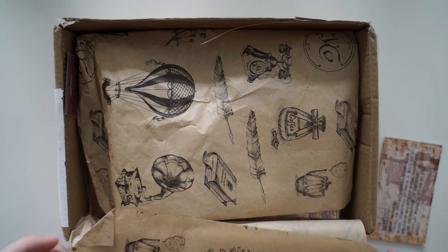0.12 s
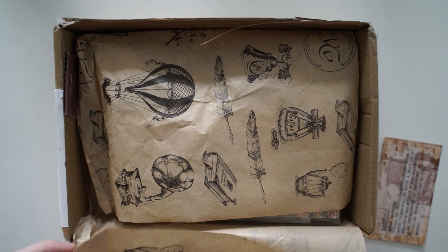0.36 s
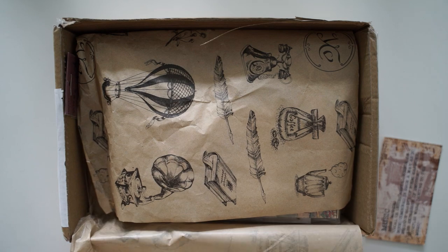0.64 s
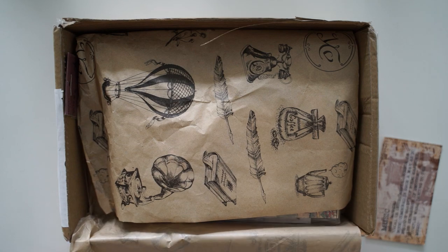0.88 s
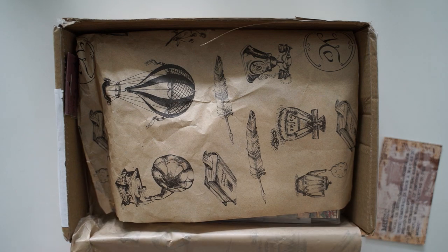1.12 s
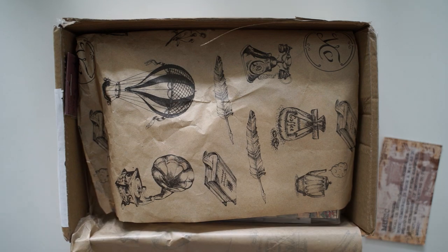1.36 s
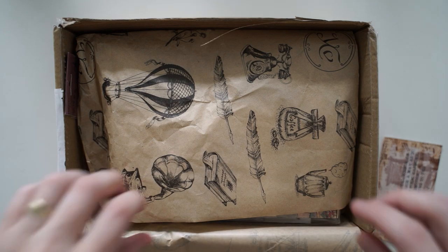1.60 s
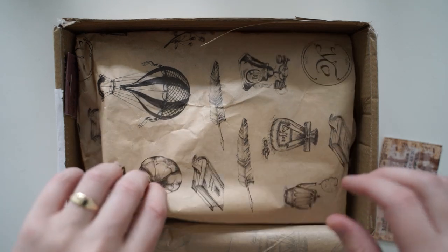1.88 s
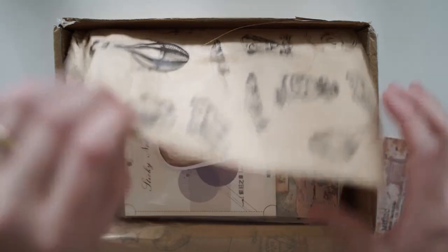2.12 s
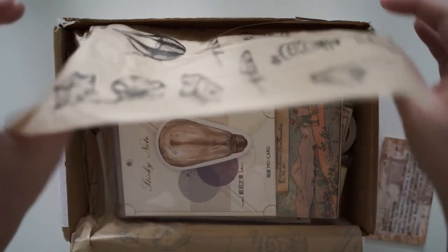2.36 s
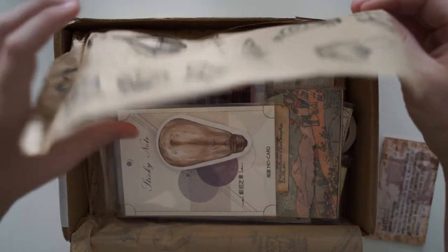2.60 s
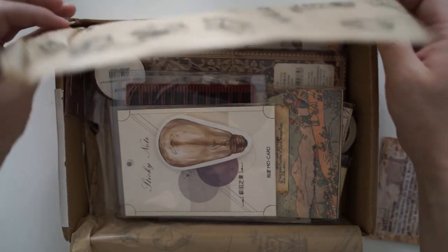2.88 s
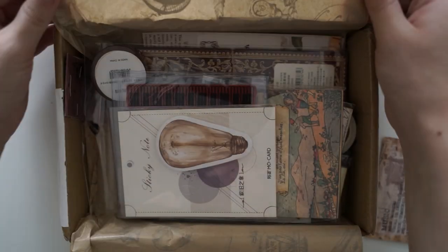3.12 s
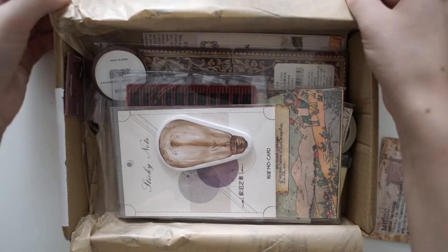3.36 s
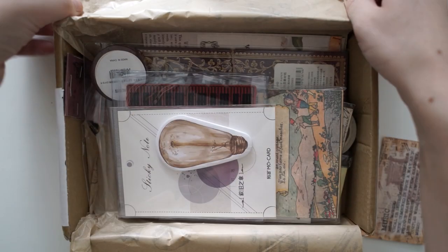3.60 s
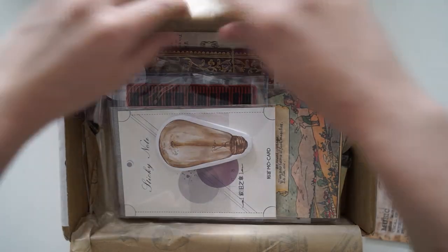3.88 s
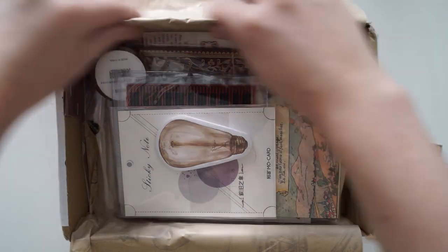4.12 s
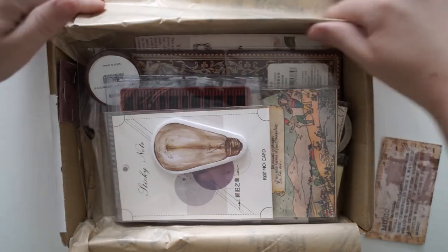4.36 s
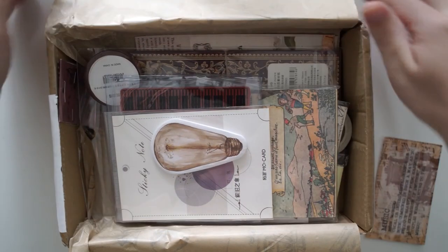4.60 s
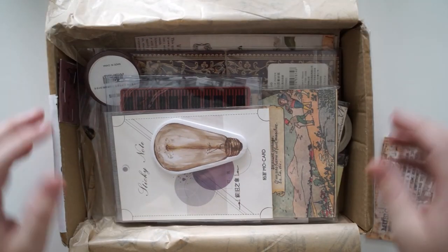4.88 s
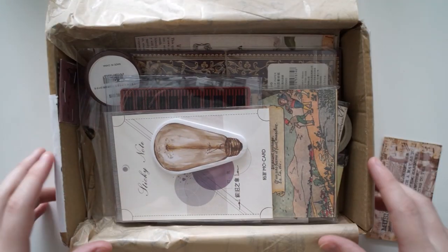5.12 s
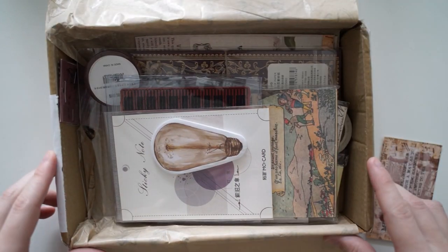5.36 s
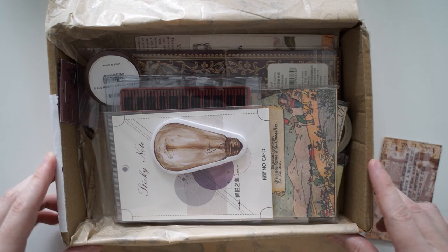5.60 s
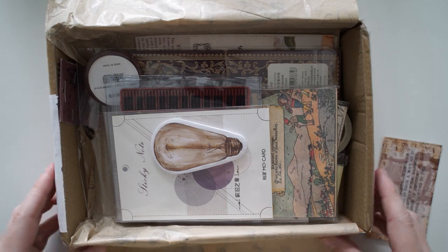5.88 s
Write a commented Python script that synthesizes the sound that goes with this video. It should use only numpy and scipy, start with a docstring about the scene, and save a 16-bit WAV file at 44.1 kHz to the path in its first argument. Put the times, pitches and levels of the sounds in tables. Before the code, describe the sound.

Hands unfold stiff wrapping paper over a cardboard box, sharp crinkly snaps over fine crackle and hiss, with short pauses in a small quiet room.

```python
"""Short snaps stand out over clumps of tiny crackles and a hiss: hands unfold stiff wrapping paper over a
cardboard box on a table, in spells, under a stereo microphone. Creases are bursts of noise that ring panels
of the sheet; the hollow box and the flexing sheet resonate along. A few soft low bumps come between.
A small room answers the paper with decaying noise, over a faint room tone of air noise and hum."""
import sys
import numpy as np
from scipy import signal
from scipy.fft import rfft, irfft, next_fast_len
from scipy.io import wavfile
from scipy.ndimage import uniform_filter1d, map_coordinates

SR = 44100
rng = np.random.default_rng(int(sys.argv[2]) if len(sys.argv) > 2 else 0)


def voltage_ratio(decibels):
    """Convert decibels (scalar or array-like) to amplitude ratios, 20 dB per decade."""
    exponent = np.asarray(decibels, float) / 20
    return 10 ** exponent


def to_wav(sig):
    """Store sig (one row per channel, or 1-D mono) as 16-bit WAV at the path in sys.argv[1].

    Samples outside -1..1 are clipped; the rate is SR.
    """
    pcm = np.clip(np.atleast_2d(sig), -1, 1) * 32767
    pcm = np.round(pcm).astype(np.int16)
    wavfile.write(sys.argv[1], SR, pcm.T)  # frames by channels


N = 264159

SPLIT_HZ = 2200  # between the low and the high half of the paper sound
TOP_HZ = 11030  # upper end of the treble


def unit(x):
    """Scale to rms 1."""
    return x / np.sqrt(np.mean(x ** 2) + 1e-20)


def along(points, hz):
    """Read (frequency [Hz], value) points on a log frequency axis."""
    f, v = np.transpose(points)
    return np.interp(np.log(hz + 1), np.log(f + 1), v)


def filtered(x, response):
    """Multiply the spectrum of x by a complex response of frequency."""
    m = next_fast_len(N + SR // 2)
    return irfft(rfft(x, m) * response(np.fft.rfftfreq(m, 1 / SR)), m)[..., :N]


def resonance(hz, centre_hz, width_hz):
    """One vibrating mode, gain 1 at its centre."""
    return 1j * hz * width_hz / (centre_hz ** 2 - hz ** 2 + 1j * hz * width_hz)


def stereo(pair):
    """Two unrelated signals become left and right, alike in the bass and apart in the treble."""
    # likeness of left and right, limited to 0-1 below: (frequency [Hz], likeness [ratio])
    alike = [(600, 1.24), (4000, 0.58), (11000, 0.24)]

    def mid_side_gains(hz):
        turn = np.arccos(np.clip(along(alike, hz), 0, 1)) / 2
        return np.array([np.cos(turn), np.sin(turn)])

    mid, side = filtered(pair, mid_side_gains)
    return np.array([mid + side, mid - side])


def room_tone():
    """Steady coloured air noise and a slightly unsteady appliance hum, a single sine."""
    # relative spectrum of the air noise: (frequency [Hz], density [dB per Hz])
    air_colour = [(25, -25), (90, -12), (300, -1.5), (520, 1), (1200, 0.5), (2500, -7.5), (4000, -10.5),
                  (11000, -16.5)]
    hum_hz, hum_db, air_db = 185, -78.0, -60.0
    noise = rng.standard_normal((2, N))
    air = unit(stereo(filtered(noise, lambda hz: voltage_ratio(along(air_colour, hz)) * (hz < TOP_HZ))))
    t = np.arange(N) / SR
    waver_db = 4.0 * map_coordinates(rng.standard_normal(60), [t * 8])  # 8 random points a second
    hum = voltage_ratio(hum_db + waver_db) * np.sin(2 * np.pi * hum_hz * t)
    return voltage_ratio(air_db) * air + hum


def thumps():
    """Soft low bumps, perhaps a hand or the sheet against the box: sines that swell and die smoothly."""
    # (start [s], envelope peak [dB], pitch [Hz])
    bumps = [(2.505, -45, 307), (4.916, -57, 280), (5.136, -52, 293)]
    peak_s = 0.0064  # time from the start to the peak
    out, t = np.zeros(N + SR), np.arange(SR // 8) / SR
    envelope = (t / peak_s) * np.exp(1 - t / peak_s)
    for s, db, hz in bumps:
        out[round(s * SR):][:len(t)] += voltage_ratio(db) * np.sin(2 * np.pi * hz * t) * envelope
    return out[:N]


def room(x, count=6):
    """Random tails, each frequency dying at its own speed, taken in turn so that no one pattern repeats."""
    # reverberation: (frequency [Hz], time to fall 60 dB [s])
    decay = [(300, 0.32), (2000, 0.14), (10000, 0.15)]
    hz, t, z = signal.stft(rng.standard_normal((count, 2, SR // 2)), SR, nperseg=256)
    tails = signal.istft(z * voltage_ratio(-60 * t / along(decay, hz)[:, None]), SR, nperseg=256)[1]
    turn = np.arange(N) // (SR // 12) % count  # the next tail takes over 12 times a second
    wet = 0
    for k, tail in enumerate(tails):
        wet = wet + signal.fftconvolve(x * (turn == k), tail / np.linalg.norm(tail[0]), axes=1)
    return np.pad(wet, ((0, 0), (200, 0)))[:, :N]  # the answer starts 200 samples late


def sheet_colour(hz, full_db):
    """Spectrum of the paper: high half of rms gain 1, low half set by the fullness."""
    # relative sound of the sheet: (frequency [Hz], density [dB per Hz])
    sheet = [(35, -69), (191, -33), (520, -8.5), (705, -7.5), (1220, -2), (2850, -1), (4800, -3.5),
             (11000, -6), (22000, -120)]
    low_share = 1 / (1 + (hz / SPLIT_HZ) ** 6)
    colour = voltage_ratio(along(sheet, hz))
    low = unit(colour * low_share ** .5)
    high = unit(colour * (1 - low_share) ** .5)
    return np.sqrt(high ** 2 + (voltage_ratio(full_db)[..., None] * low) ** 2)


def creases(s, db, ring_hz, full_db, ms, ring_db, q, size=1024):
    """Each buckling crease is a burst of noise that swells and dies, and rings the flat panel beside it."""
    rise = 0.72  # swell as a share of the burst length
    reach = 7.4  # a burst dulls above this multiple of its panel's ring
    u = np.arange(size // 2) / SR * 1000 / ms[:, None]  # time in burst lengths
    shape = np.clip(u / rise, 0, 1) * voltage_ratio(db[:, None] - 8.1 * np.clip(u - rise, 0, None) ** 1.6)
    hz, c = np.fft.rfftfreq(size, 1 / SR), ring_hz[:, None]
    panel = 1 + voltage_ratio(ring_db) * resonance(hz, c, c / q)
    colour = sheet_colour(hz, full_db) * panel / np.sqrt(1 + (hz / (reach * c)) ** 2)
    lead = size // 8  # space for the filter to spread ahead of the burst
    noise = rng.standard_normal((len(s), 2, size // 2)) * shape[:, None]
    noise = np.pad(noise, ((0, 0), (0, 0), (lead, 0)))
    rows = irfft(rfft(noise, size) * colour[:, None], size)
    # the colour leaves the energy of each burst to its envelope
    rows *= (np.linalg.norm(shape, axis=1)[:, None] / np.linalg.norm(rows, axis=2))[..., None]
    at = ((s * SR).astype(int)[:, None] + np.arange(size)).ravel()
    return np.array([np.bincount(at, rows[:, k].ravel(), N + size)[lead:][:N] for k in range(2)])


def patchy(x, worked_hz, ring_db, q, patchy_db, size=512):
    """The hiss rings the worked panel and comes in patches of random gain over time and frequency."""
    hz, t, z = signal.stft(x, SR, nperseg=size)
    c = worked_hz[np.minimum((t * SR).astype(int), N - 1)]
    # the ring frequency wobbles slightly at random
    c = c * (1 + 0.01 * map_coordinates(rng.standard_normal(300), [t * 18]))
    field = uniform_filter1d(rng.standard_normal(z.shape[1:]), size=16, axis=0)
    field = unit(uniform_filter1d(field, size=2, axis=1))
    ring = 1 + voltage_ratio(ring_db) * abs(resonance(hz[:, None], c, c / q))
    return signal.istft(z * voltage_ratio(patchy_db * field) * ring, SR, nperseg=size)[1][:, :N]


def handling(t):
    """Rustle dB and worked panel Hz: crushes swell, sag while held, stop and relax over each spell's rustle."""
    # spells in which the hands touch the paper: (start [s], end [s], faint rustle [dB])
    spells = [(0.131, 1.335, -56), (1.70, 4.77, -56), (5.105, 6.0, -55)]
    # the hands crush or pull the sheet:
    # (peak [s], rustle [dB], swell [s], hold [s], ring of the panel they work [Hz])
    crushes = [(0.012, -47, .02, .015, 1590), (.145, -41.5, .02, .09, 3930), (0.412, -38, .03, .07, 1183),
               (.535, -38, .015, .045, 4400), (0.62, -45, .05, .04, 3380), (0.713, -40, .03, .018, 2700),
               (.842, -28, .012, .048, 3130), (0.955, -35, .03, .02, 3030), (1.016, -35, .008, .02, 4530),
               (1.158, -43, .04, .04, 4400), (1.706, -42, .008, .05, 1320), (1.892, -33, .015, .06, 3140),
               (2.053, -31.5, .007, .024, 3520), (2.18, -43, .08, .05, 5050),
               (2.444, -36.5, .015, .085, 2790), (2.549, -34, .015, .018, 2130),
               (2.595, -39, .03, .04, 2760), (2.829, -37, .1, .15, 2860), (3.073, -33, .05, .16, 2840),
               (3.256, -32.5, .03, .11, 1716), (3.483, -36, .04, .085, 4300), (3.659, -37, .08, .07, 832),
               (3.79, -42, .1, .05, 4070), (3.97, -29, .012, .045, 1730), (4.04, -42, .03, .06, 4300),
               (4.16, -33, .07, .065, 2720), (4.238, -32, .02, .035, 2840), (4.331, -36, .05, .2, 3300),
               (4.621, -45.5, .1, .1, 2780), (5.109, -43.5, .008, .11, 1277),
               (5.287, -40, .015, .075, 1380), (5.364, -31, .01, .035, 1255), (5.45, -37, .06, .055, 1014),
               (5.975, -40, .07, .03, 3320)]
    still_db, settle_db_per_s = -82, 170  # untouched paper; after a spell
    swell_db = 15  # rise within the swell time
    sag_db_per_s, fade_db_per_s = 40, 898.5  # in the hold; at letting go
    relax_db, relax_db_per_s = 11, 110  # the sheet relaxing afterwards: start below the crush, fall
    power = np.full(len(t), voltage_ratio(still_db) ** 2)
    for start, end, db in spells:
        power += (t > start) * voltage_ratio(db - settle_db_per_s * np.clip(t - end, 0, None)) ** 2
    strongest, worked_hz = np.zeros(len(t)), np.zeros(len(t))
    for s, db, swell, hold, hz in crushes:
        rising_db = swell_db * np.clip(s - t, 0, None) / swell
        sag_db = sag_db_per_s * np.clip(t - s, 0, hold)
        after = np.clip(t - s - hold, 0, None)
        release_db = np.minimum(fade_db_per_s * after, relax_db_per_s * after + relax_db)
        crush = voltage_ratio(db - rising_db - sag_db - release_db) ** 2
        worked_hz[crush > strongest] = hz  # the strongest crush decides the panel
        strongest = np.maximum(strongest, crush)
        power += crush
    return 10 * np.log10(power), worked_hz


def small_creases(rustle_db, worked_hz, full_db):
    """Tiny crackles at random moments, clumped in level, long-tailed in size, each with its own panel."""
    worked_share = .5  # share of the creases that ring close to the worked panel
    when, size, length, tone, panel = rng.random((1800, 5)).T
    # harder handling buckles more creases a second, each only a little louder
    crowd_db = .5 * (rustle_db - rustle_db.mean())
    passed = np.cumsum(voltage_ratio(crowd_db))
    at = np.searchsorted(passed, when * passed[-1]).clip(0, N - 1)
    clump_db = 2.0 * map_coordinates(rng.standard_normal(300), [at * 45 / SR])
    size_db = -5.07 * np.log(1 - 0.84 * size)
    db = (rustle_db - crowd_db / 2)[at] - 3.5 + clump_db + size_db
    near_hz = worked_hz[at] * (1 + 0.33 * (panel - worked_share / 2))
    elsewhere_hz = 1000 * 9.64 ** rng.random(len(at))
    panel_hz = np.where(panel < worked_share, near_hz, elsewhere_hz)
    fat_db = full_db[at] + 15 * (tone - .5)
    return creases(at / SR, db, panel_hz, fat_db, 1.27 + 1.72 * length, ring_db=10.5, q=27.0)


def snaps(t, worked_hz, full_db):
    """Large creases snap: in the held panel under the hands, damped, or elsewhere, where a free panel rings."""
    # in the panel under the hands: (time [s], nominal peak [dB])
    held = [(0.2093, -18), (0.2269, -28.5), (0.417, -26), (0.4362, -28), (0.5113, -31), (0.5372, -19.5),
            (0.5684, -33), (0.602, -25), (0.6734, -27.5), (0.6826, -24), (0.7126, -19), (0.7604, -28),
            (0.7841, -18), (0.798, -25.5), (0.815, -23), (0.844, -14), (0.9504, -16), (0.9604, -15.5),
            (0.9827, -28), (1.1049, -21), (1.1602, -23), (1.1897, -27), (1.289, -37.5), (1.8004, -28),
            (1.9725, -25.5), (1.9828, -23.5), (2.1765, -27.5), (2.1947, -15.5), (2.2489, -30),
            (2.4455, -21.5), (2.5161, -21.5), (2.5574, -22.5), (2.563, -25), (2.595, -18.5), (2.816, -22.5),
            (3.0322, -22), (3.04, -18), (3.1539, -16.5), (3.2714, -18), (3.2795, -17), (3.3202, -15),
            (3.4801, -18.5), (3.4933, -16), (3.5224, -14), (3.5372, -22), (3.5513, -19.5), (3.5569, -18),
            (3.6153, -28), (3.676, -21.5), (4.0114, -23.5), (4.0764, -28), (4.1103, -25), (4.1249, -20),
            (4.1546, -20.5), (4.1807, -22), (4.197, -16.5), (4.2074, -18.5), (4.24, -19), (4.3086, -23),
            (4.4874, -22.5), (4.5005, -26), (4.756, -34), (4.802, -34.5), (5.3326, -18.5), (5.3623, -17),
            (5.375, -17), (5.3901, -18), (5.4682, -15.5), (5.52, -27), (5.679, -39), (5.7374, -31.5),
            (5.764, -25), (5.7935, -25.5), (5.8103, -19), (5.9615, -31), (5.9732, -23)]
    # elsewhere on the sheet: (time [s], nominal peak [dB], ring of their own panel [Hz])
    stray = [(0.0803, -31.5, 1090), (0.1826, -26, 1110), (0.39, -27, 6120), (0.4061, -17, 6640),
             (0.87, -17.5, 7350), (0.4635, -22.5, 2070), (0.917, -22, 7250), (1.089, -19, 4200),
             (1.229, -30, 1300), (1.3343, -32.5, 1930), (1.699, -22.5, 4200), (1.7204, -17.5, 7100),
             (1.7873, -27.5, 2740), (1.8244, -26, 2900), (1.841, -20.5, 3030), (1.89, -18, 1860),
             (2.281, -29.5, 1400), (2.3203, -22, 1870), (2.405, -21.5, 1800), (2.8231, -16.5, 9800),
             (2.837, -26.5, 7950), (2.917, -28.5, 7040), (3.022, -27.5, 1570), (3.1116, -13.5, 5200),
             (3.194, -22, 4430), (3.2266, -18, 4400), (3.3446, -12, 4170), (3.4275, -18, 7000),
             (3.459, -23.5, 2780), (3.881, -27, 1360), (3.969, -17.5, 3980), (4.2187, -20.5, 5000),
             (4.397, -22.5, 5050), (4.4704, -20, 10000), (4.525, -25.5, 1830), (5.109, -25.5, 4180),
             (5.153, -29.5, 5200), (5.246, -35, 4150), (5.2827, -15.5, 6650), (5.5, -15.5, 2780),
             (5.6083, -27.5, 1620), (5.658, -32.5, 2750), (5.702, -30, 3376), (5.7243, -28.5, 1364),
             (5.7688, -28, 1080), (5.856, -28, 1568)]
    held_ring_db, free_ring_db = 0, 8
    crest_db = 6.5  # nominal peak over the level of the burst
    s, db, ring_hz = np.transpose([(s, db, worked_hz[round(s * SR)]) for s, db in held] + stray)
    # a larger panel rings lower and sounds fuller
    fat_db = np.interp(s, t, full_db) - 2.5 + 1.26 * np.log2(SPLIT_HZ / ring_hz)
    ms = 1.97 + 2.0 * rng.random(len(s))
    ring_db = np.repeat((held_ring_db, free_ring_db), [len(held), len(stray)])[:, None]
    return creases(s, db - crest_db, ring_hz, fat_db, ms, ring_db=ring_db, q=7)


def paper_hiss(worked_hz, full_db):
    """Noise in a dull and a bright part, mixed by the fullness; its ring jumps to each new worked panel."""
    dull, bright = (filtered(rng.standard_normal((2, N)), lambda hz: sheet_colour(hz, np.array(db)))
                    for db in (20., -60.))
    mix = unit(bright) + voltage_ratio(full_db) * unit(dull)
    return patchy(mix, worked_hz, ring_db=3.0, q=36, patchy_db=5.5)


def paper():
    """Large snaps over clumped small crackles and a patchy hiss; the box and the whole sheet ring along."""
    # (time [s], lift of the sheet off the box [0-1], level of the low half of the rustle [dB])
    lift_points = [(0, 0.23, 1), (.2, 0.51, -4), (1.3, 0.24, -3), (1.75, 0.19, -5), (2.15, 0.76, -2.5),
                   (2.8, 0.92, -2), (3.7, 0.5, -3), (4.2, 0.66, -4), (4.75, 0.98, -1), (5.38, 0.14, 0.5),
                   (5.55, 0.33, -3.5), (5.99, 0.32, -5)]
    # lying in the box the sheet sounds the hollow, held up it flexes as a whole: (lying, lifted)
    hollow_ends_db, flex_ends_db = (7.5, -29), (-2.5, 14.5)
    # the top treble grows as the sheet comes up to the microphone
    sheen_hz, sheen_ends_db = 7350, (-6, 6)
    t = np.arange(N) / SR
    rustle_db, worked_hz = handling(t)
    s, *columns = np.transpose(lift_points)
    lift, full_db = (np.interp(t, s, c) for c in columns)
    # a large, low panel makes the rustle duller
    full_db = full_db + 0.31 * np.log2(SPLIT_HZ / worked_hz)
    hollow_db, flex_db, sheen_db = (np.interp(lift, (0, 1), ends)
                                    for ends in (hollow_ends_db, flex_ends_db, sheen_ends_db))
    small = small_creases(rustle_db, worked_hz, full_db)
    big = snaps(t, worked_hz, full_db)
    rustle = small + voltage_ratio(rustle_db - 9.5) * paper_hiss(worked_hz, full_db)
    direct = rustle + big
    # hollow of the open box, then flexing of the whole sheet: centre and width in Hz
    hollow = filtered(voltage_ratio(hollow_db) * rustle, lambda hz: resonance(hz, 1120, 650) ** 2)
    flex = filtered(voltage_ratio(flex_db) * direct, lambda hz: resonance(hz, 178, 228) ** 2)
    top = filtered(direct, lambda hz: 1 / (1 + (sheen_hz / (hz + 1)) ** 4))
    sheen = (voltage_ratio(sheen_db) - 1) * top
    return stereo(direct + sheen + hollow + flex)


def scene():
    """Paper, its reverberation, the soft bumps and the room tone."""
    sheet = paper()
    return sheet + voltage_ratio(-10.0) * room(sheet) + thumps() + room_tone()


def top_cut(x):
    """Nothing passes above the cut-off."""
    return signal.sosfilt(signal.butter(12, 12360, fs=SR, output="sos"), x)


def record(dry):
    """The left channel is a little weaker than the right; the treble is cut steeply at TOP_HZ."""
    # left minus right, half given to each side: (frequency [Hz], level difference [dB])
    lean = [(350, -2), (2020, -1.5), (11800, -3)]

    def channel_gains(hz):
        return voltage_ratio(along(lean, hz) * np.array([[.5], [-.5]])) * (hz < TOP_HZ)

    return top_cut(filtered(dry, channel_gains))


dry = scene()
out = record(dry)
to_wav(out)
```